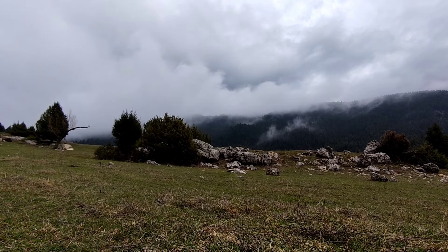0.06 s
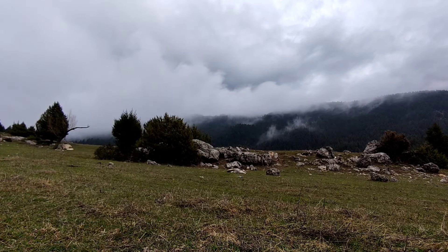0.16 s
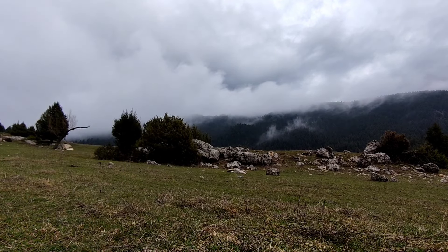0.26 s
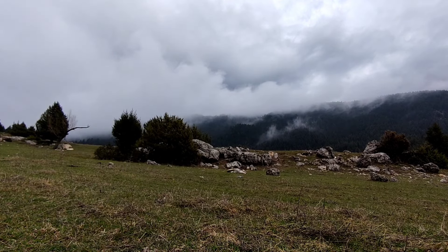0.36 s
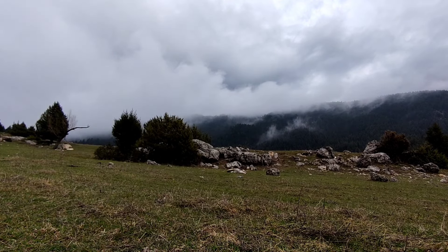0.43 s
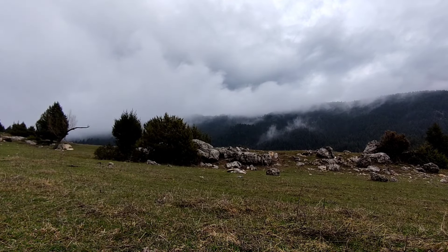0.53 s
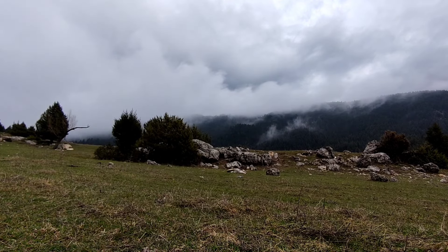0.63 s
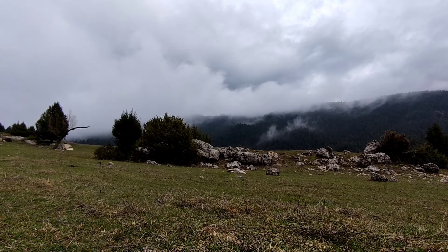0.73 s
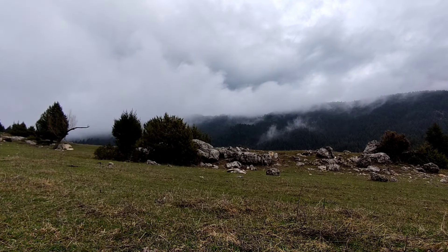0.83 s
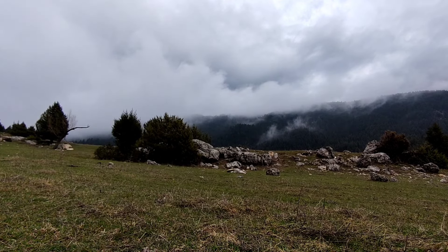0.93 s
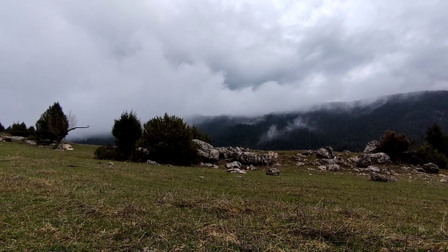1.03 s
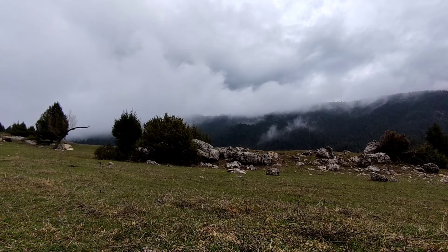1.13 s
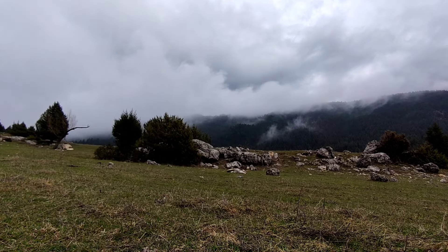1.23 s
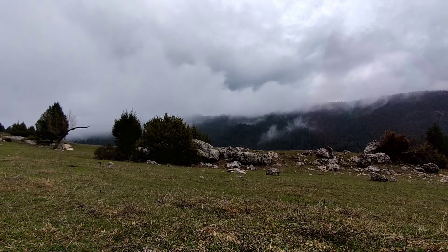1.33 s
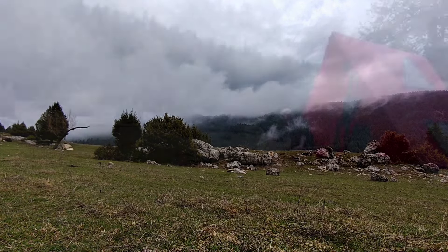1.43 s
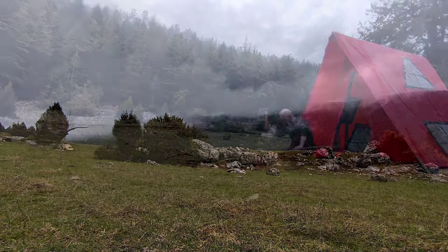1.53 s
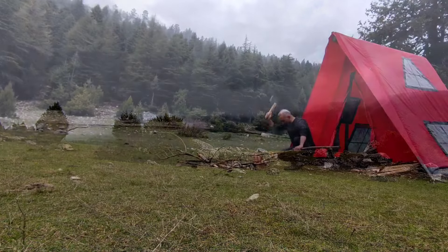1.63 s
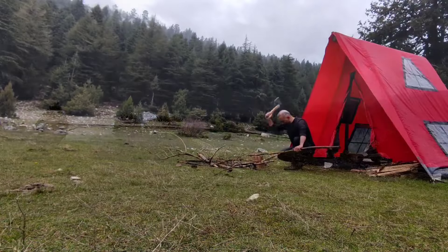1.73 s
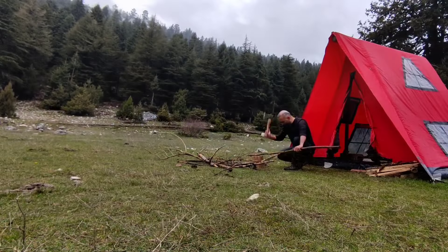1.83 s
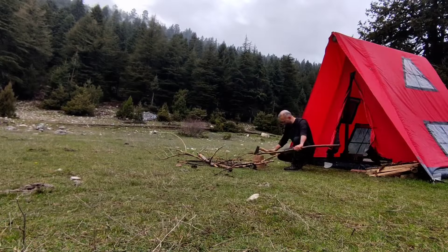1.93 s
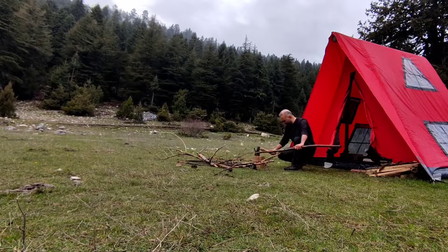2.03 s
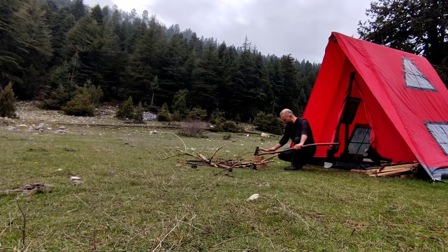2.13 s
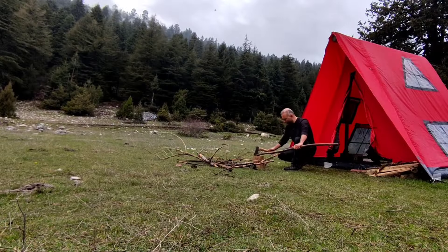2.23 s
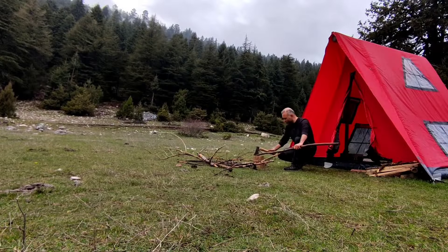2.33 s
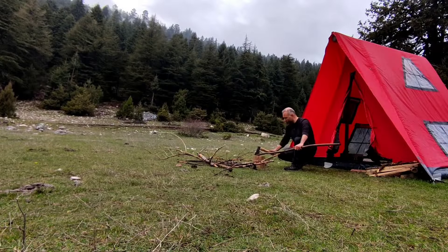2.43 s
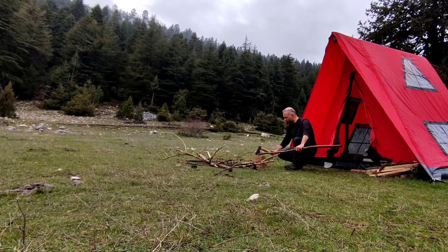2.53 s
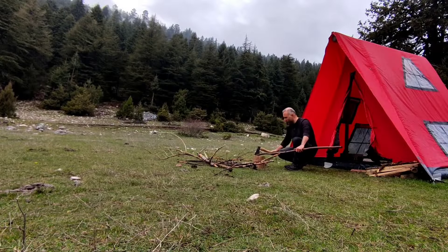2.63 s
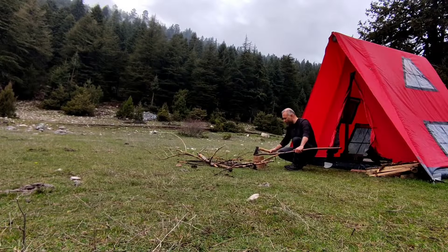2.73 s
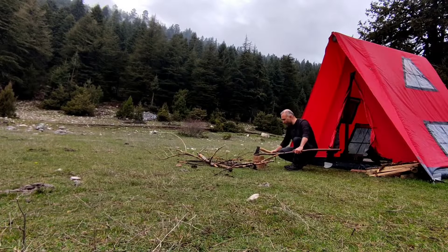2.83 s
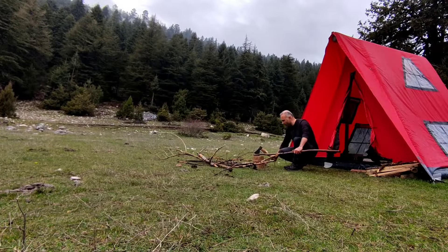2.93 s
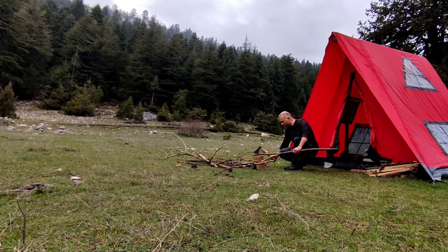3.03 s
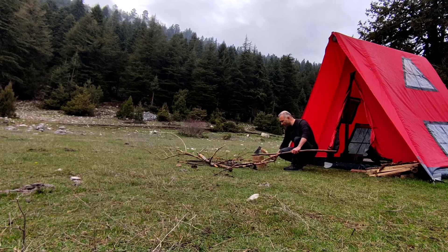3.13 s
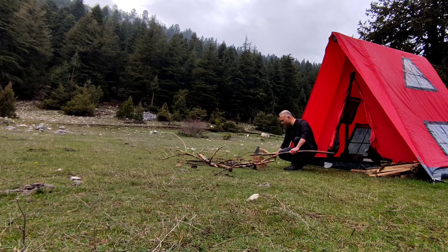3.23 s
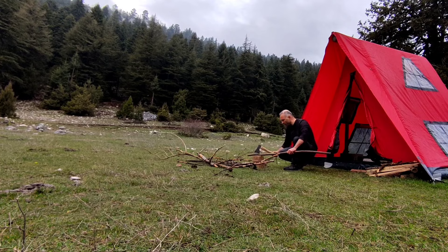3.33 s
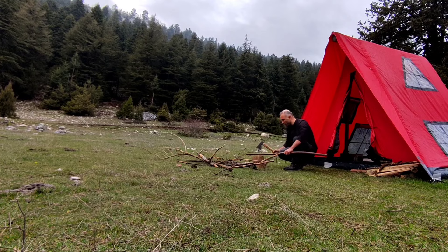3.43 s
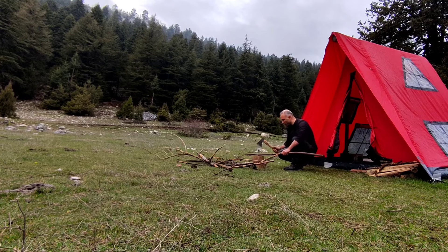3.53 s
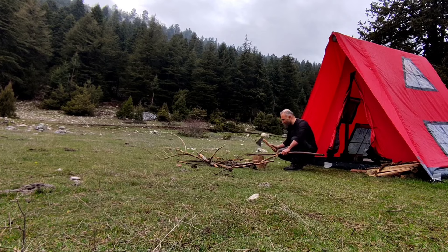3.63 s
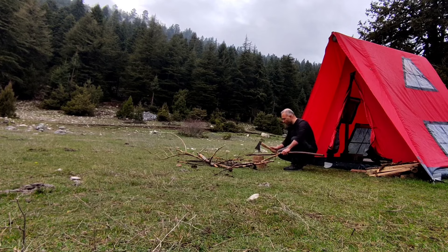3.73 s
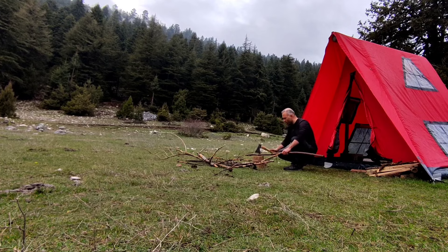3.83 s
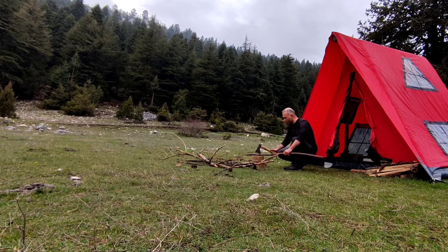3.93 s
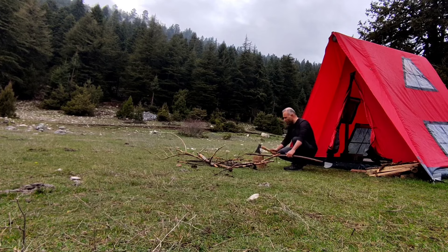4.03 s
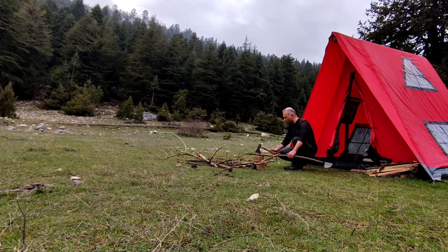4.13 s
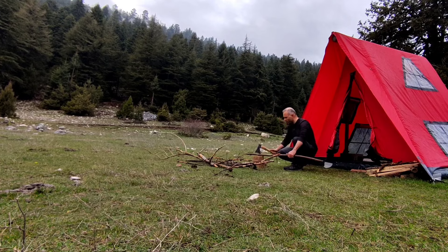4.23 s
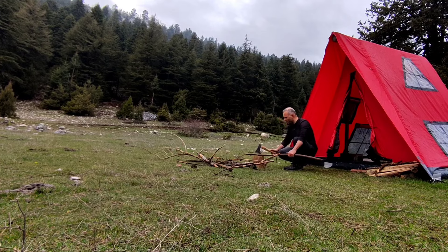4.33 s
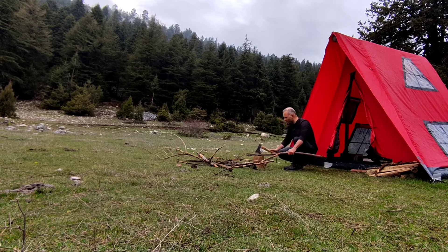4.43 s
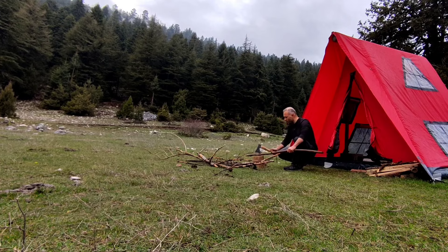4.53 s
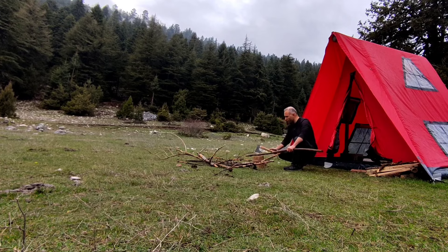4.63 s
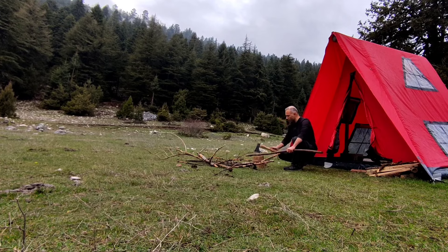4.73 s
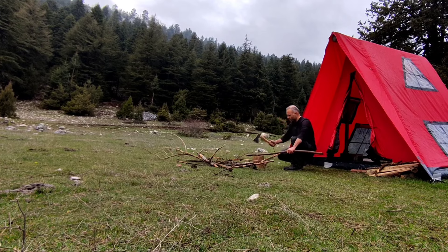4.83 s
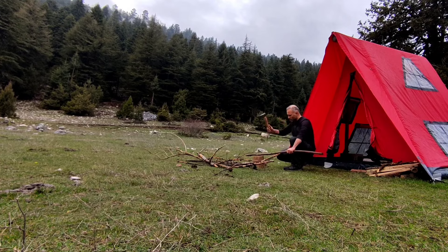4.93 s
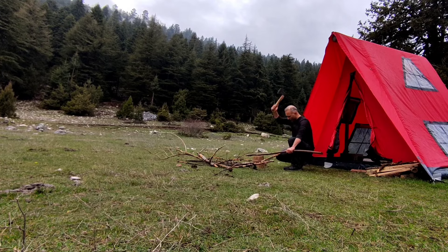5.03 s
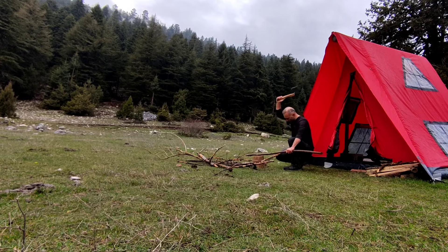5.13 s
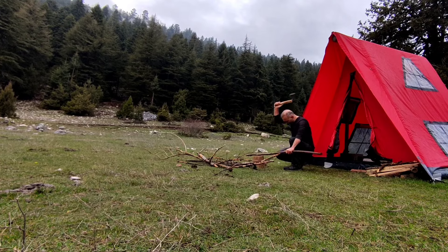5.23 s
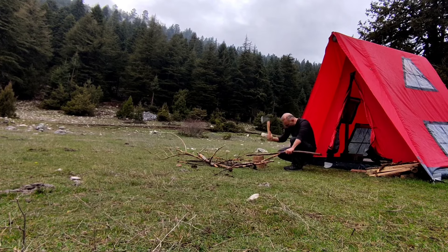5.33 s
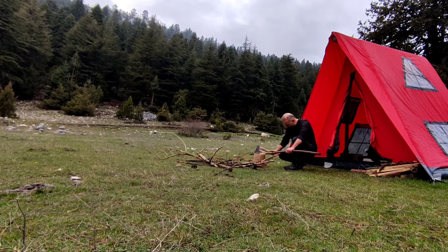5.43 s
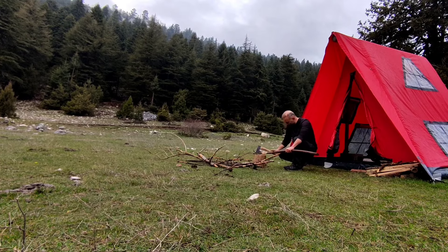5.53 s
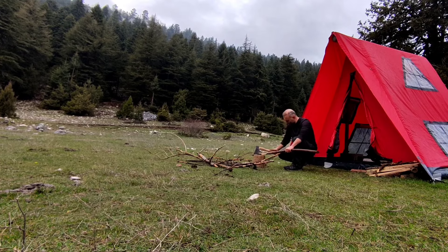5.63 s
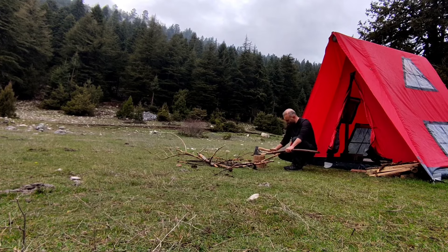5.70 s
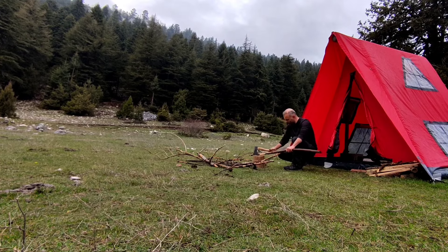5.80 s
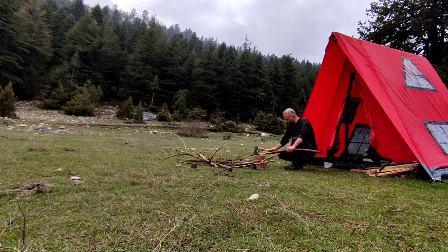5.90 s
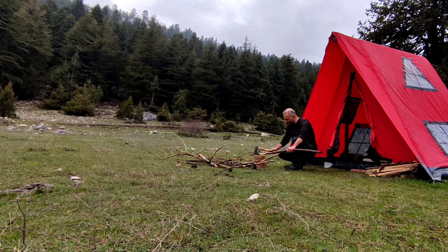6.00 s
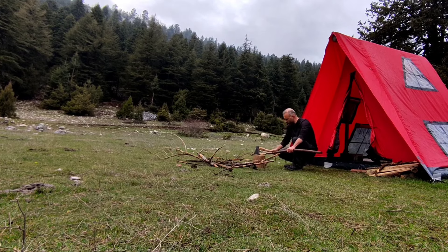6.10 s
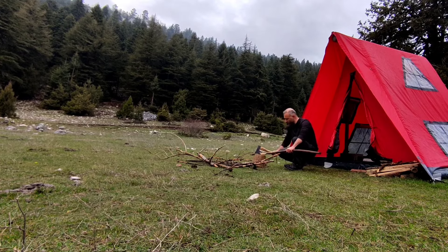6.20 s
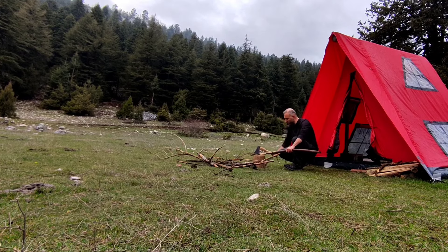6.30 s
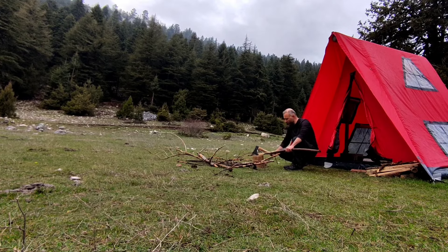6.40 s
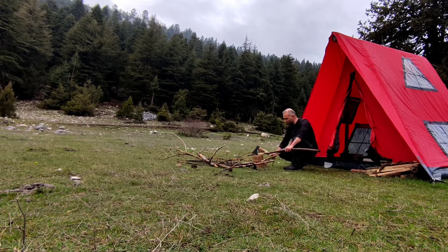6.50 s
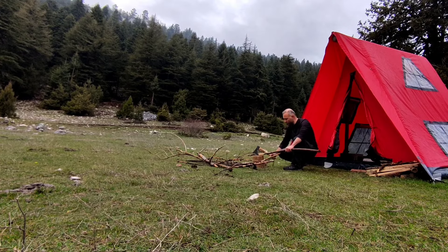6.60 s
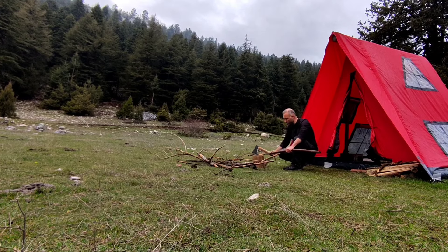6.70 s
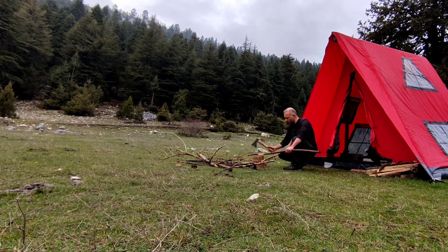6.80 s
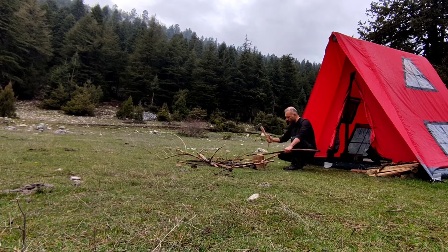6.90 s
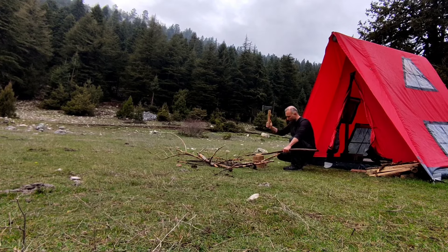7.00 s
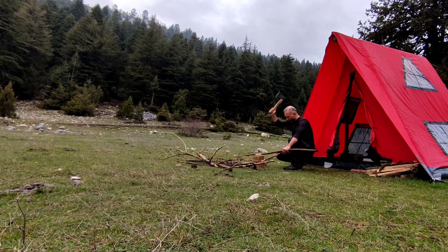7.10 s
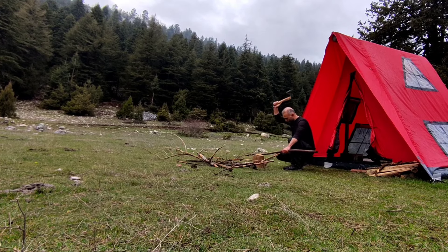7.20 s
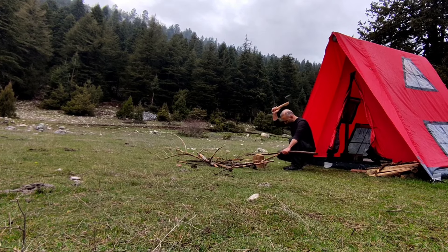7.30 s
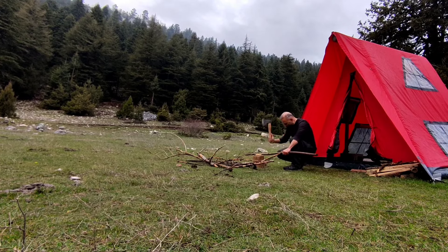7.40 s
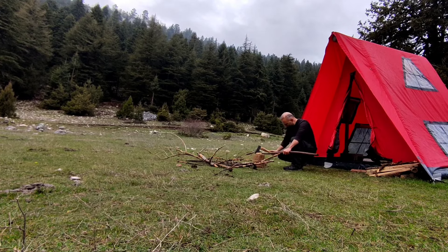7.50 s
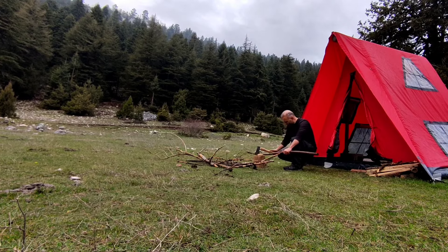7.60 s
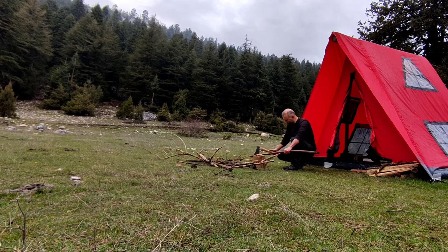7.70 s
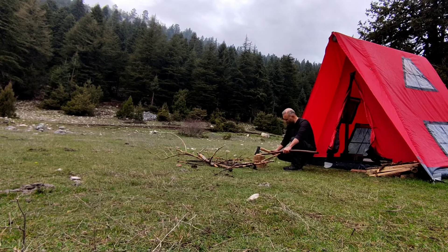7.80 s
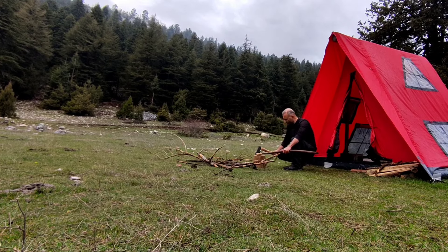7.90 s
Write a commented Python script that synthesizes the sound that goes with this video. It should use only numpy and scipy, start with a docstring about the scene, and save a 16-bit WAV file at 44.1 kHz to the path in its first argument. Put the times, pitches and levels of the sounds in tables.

```python
"""A mountain meadow by a forest edge: a hatchet chops a dry branch on a wooden block, with three hard blows
and a light one (the second). Fibres crack, the block thuds, chips fall, twigs rattle and the trees echo.
Gusts rumble in the microphone and stir dry grass, then a crossfade leads to calm with a few faint puffs;
small birds twitter far away over a soft rush of air. Wood is noise and short impulses ringing resonances,
wind, grass and air are coloured noise, and birds are sine waves with bending pitch."""
import sys
import numpy as np
from scipy import signal
from scipy.fft import rfft, irfft, next_fast_len
from scipy.io import wavfile
from scipy.ndimage import uniform_filter1d

SR = 44100
rng = np.random.default_rng(int(sys.argv[2]) if len(sys.argv) > 2 else 0)


def dump(signal):
    """Clip the signal to [-1, 1] and save it as 16-bit WAV at the path in sys.argv[1]."""
    limited = np.clip(np.atleast_2d(signal).T, -1, 1)
    pcm = np.round(limited * 32767).astype(np.int16)
    wavfile.write(sys.argv[1], SR, pcm)


N = 350595
T = np.arange(N) / SR
CUTOFF_HZ = 16000  # top of the sound

# All levels in the tables are relative: the functions may trim them further.
# How long the fibres tear (Gaussian spread), and the time until the head stops on the block.
CRACK_SPREAD_S, REACH_BLOCK_S = 0.0016, 0.002948
SLAPBACK_S, SLAPBACK_DB = 0.0061, -28.5  # slapback from close by: a second, weaker crack
# Hatchet blows. Each row: start in seconds, crack level in dB, crack pitch in Hz, pitch emphasis in dB,
# treble tilt in dB per octave, thud level in dB, contact time in seconds, knock pitch in Hz,
# knock level in dB, splinter level in dB, splinter decay by 60 dB in seconds, singing level in dB.
CHOPS = [(1.971, -14, 3090, 16, -3, -12.5, 0.00089, 520, 2, -26.5, 0.061, -54),
         (3.8451, -44, 3340, 30.5, 2, -42.5, 0.0003, 490, 2, -46, 0.083, -69),
         (5.457, -10.5, 4070, 7.5, -3, -12.5, 0.00062, 764.4, 9, -25, 0.085, -48),
         (7.5207, -10.5, 4130, 11.5, 0, -12, 0.0012, 833, 9, -26.5, 0.086, -48)]
# The spot where each blade stroke lands favours some resonances and sits on a still point of others.
# One list for each blow; each row: pitch in Hz, boost or cut in dB.
SPOTS = [
    [(1100, 3.5), (2875, 4), (7500, 4.5), (275, -12), (2400, -7), (5550, -7.5)],
    [(250, 11), (475, 3.5), (700, 12.5), (2750, 10.5), (560, -14), (1300, 0), (2030, -23)],
    [(299, 6), (530, 0.5), (4900, 2.5), (650, -8), (1202, -11), (1680, -3.5), (6040, -11)],
    [(507, 2.5), (650, 1), (2600, 3.5), (3550, 4), (5470, 7), (276, -13), (3070, -12.5), (5000, -7)],
]


def chops(tearing_db=-10, tearing_t60=0.08, block_db=2, fibres_db=4):
    """Each blow cracks and thuds, then splinters and drops bark, coloured by the spot the blade hits."""
    out, lead = np.zeros(N), .006  # seconds of room before the contact
    t = np.arange(SR // 3) / SR - lead
    for row, spot in zip(CHOPS, SPOTS):
        s, crack_db, hz, emphasis_db, treble_db, thud_db, contact = row[:7]
        knock_hz, knock_db, splinter_db, splinter_t60, singing_db = row[7:]
        blow = from_db(crack_db) * crack(t, CRACK_SPREAD_S, hz, emphasis_db, treble_db)
        slapback = crack(t - SLAPBACK_S, CRACK_SPREAD_S, hz, 0, treble_db)
        blow += from_db(crack_db + SLAPBACK_DB) * slapback
        blow -= from_db(thud_db + block_db) * thud(t, contact, REACH_BLOCK_S, knock_hz, knock_db)
        blow += from_db(splinter_db + fibres_db) * splinters(t, splinter_t60)
        blow += from_db(singing_db) * ringing(t)
        finest_fibres = colour(grains(len(t), spread_db=-1.5) * fade(t, tearing_t60), STALK)
        blow += from_db(splinter_db + tearing_db) * finest_fibres
        add(out, s - lead, struck_at(blow, spot))
    return out


# Short cross-grain rings of the branch. Each row: pitch in Hz, width in Hz, level in dB.
BRANCH = [(1553, 68, -6), (1837, 88, -14), (2410, 100, -3), (2622, 130, -9), (3614, 100, -11),
          (4250, 620, -23.5), (5150, 230, -26), (6800, 210, -6.5), (8460, 1000, -5.5), (9730, 250, -4)]
# Colour of the crack. Each row: frequency in Hz, level in dB per Hz.
CRACK = [(150, -22), (500, -4), (850, 0), (1300, -9), (2300, -1), (3400, -4), (5400, -2), (7000, -6),
         (10000, -5), (13000, -4), (16000, -12)]


def crack(t, spread, hz, emphasis_db, treble_db, ring_db=11, width_hz=420):
    """The edge tears through the fibres in a few milliseconds and sets the branch ringing."""
    bite = np.exp(-.5 * (t / spread) ** 2)
    snaps = tear(bite)
    rings = sum(from_db(db) * resonate(snaps, f, w) for f, w, db in BRANCH)
    wood = snaps + from_db(ring_db) * rings
    # the piece under the blade has a pitch of its own
    wood = wood + from_db(emphasis_db) * resonate(wood, hz, width_hz)
    wood = colour(wood, [(f, db + treble_db * np.log2(max(f, 3000) / 3000)) for f, db in CRACK])
    return wood * np.sqrt(np.sum(bite ** 2) / np.sum(wood ** 2))


def tear(bite, count=4):
    """A short volley of fibre snaps that excites all pitches about evenly."""
    snaps = rng.standard_normal(len(bite)) * bite
    for _ in range(count):  # flatten the spectrum, then shorten the sound again
        spectrum = rfft(snaps)
        snaps = irfft(spectrum / (np.abs(spectrum) + 1e-12), len(bite)) * np.sqrt(bite)
    return snaps


# Block and branch bending together. Each row: pitch in Hz, level in dB, decay by 60 dB in seconds.
BLOCK = [(97.8, -20.5, 0.18), (128, -16.5, .07), (194, -2.5, 0.054), (260, -9.5, 0.056), (353, 1, 0.023),
         (425, -1.5, .04), (520, 2.5, 0.022), (574, -13, 0.056), (635, -8, 0.046), (920.6, -6, 0.075),
         (1033, -9.5, 0.052)]


def thud(t, contact, stop_s, knock_hz, knock_db, knock_t60=0.028, first_share=0.21, radiate_hz=70):
    """The branch is pressed down, then the head stops on the block; a longer contact is duller."""
    press = first_share * np.exp(-np.abs(t) / contact * 2)
    push = np.exp(-np.abs(t - stop_s) / contact * 2) - press
    age = t - t[0]
    # the free end of the branch adds a knock that depends on its length
    modes = list(BLOCK) + [(knock_hz, knock_db, knock_t60)]
    body = sum(from_db(db) * np.cos(2 * np.pi * hz * age) * fade(age, t60) for hz, db, t60 in modes)
    # a small block radiates little bass
    body = signal.sosfilt(signal.butter(5, radiate_hz, "high", fs=SR, output="sos"), body)
    return signal.fftconvolve(push / (contact * SR), body)[:len(t)]


# Colour of splintering. Each row: frequency in Hz, level in dB per Hz.
SPLINTER = [(100, -15), (300, 13), (800, 4), (1500, 0.5), (2800, -2), (4600, 1), (7000, -7.5), (10000, -1),
            (12000, -16), (16000, -23.5)]


def splinters(t, t60, litter_t60=0.33, litter_db=-24, crumbs_db=-24):
    """A dense crackle of parting fibres, then lighter litter and crumbs of bark."""
    litter = from_db(litter_db) * fade(t, litter_t60) * lumpy(len(t), spread_db=1.5, lump_s=0.0033)
    crackle = grains(len(t), spread_db=5) * (fade(t, t60) + litter)
    return colour(crackle + from_db(crumbs_db) * crumbs(t), SPLINTER)


def crumbs(t, t60=0.33, size_db=0.0, per_s=900):
    """Bits of bark patter down at random after a blow, ever more lightly."""
    landed = rng.random(len(t)) < per_s / SR
    spread = size_db * np.clip(rng.standard_normal(len(t)), -2, 2)
    sizes = rng.choice([-1, 1], len(t)) * from_db(spread)
    return rms_one(landed * sizes) * fade(t, t60)


# Faint lasting rings of the branch. Each row: pitch in Hz, level in dB, decay by 60 dB in seconds.
SINGING = [(1316, 1, 0.11), (1430, 3, .16), (1803.4, 0.5, .16), (2330, 0, .2), (3612, -2.5, 0.2),
           (4020, 2.5, .26), (4560, -0.5, .26), (5640, -3.5, 0.15), (7200, -4, .2), (8461, -5, .22)]


def ringing(t):
    """The dry branch sings on faintly after the crack, each mode with a chance strength of its own."""
    return sum(from_db(db + rng.normal(0, 3)) * np.sin(2 * np.pi * hz * t) * fade(t, t60)
               for hz, db, t60 in SINGING)


def struck_at(x, spot, lift_width=0.11, node_width=0.13):
    """Resonances that the spot favours ring out; those with a still point there drop away."""
    for hz, db in spot:
        width = hz * (lift_width if db > 0 else node_width)
        x = x + (from_db(db) - 1) * resonate(x, hz, width)
    return x


# Pieces of wood knocking; the row at 5.4662 s is the branch breaking a second time. Each row: start in seconds,
# # peak of the wood in dB, pitch in Hz, rattle decay by 60 dB in seconds, snap in dB against the knock, dull
# above # this Hz, mode width as a share of its pitch, turf thump in dB against the knock.
KNOCKS = [(2.046, -38.5, 900, 0.027, 1, 1200, 0.43, -6), (2.049, -37.5, 545, 0.015, -1, 1200, 0.28, -12.5),
          (2.192, -51, 421, 0.06, -12, 3000, 0.17, 0), (2.304, -48, 636, 0.018, -0.5, 896, 0.21, -4),
          (2.398, -48.5, 874, 0.035, -22, 1100, 0.04, -1.5),
          (2.402, -49.5, 1120, 0.045, -26, 1300, 0.054, 6), (2.432, -52, 925, 0.033, -26, 1200, .12, -4),
          (2.552, -48.5, 1020, 0.062, 4.5, 2000, .16, -5),
          (3.845, -34.5, 934, 0.025, -17, 1190, 0.19, -13.5), (3.861, -37, 470, 0.096, -13, 1520, 0.12, -6),
          (5.4662, -23, 950, 0.033, -3, 2000, 0.34, -21), (5.664, -40, 930, 0.024, -31, 1300, 0.21, -4),
          (5.665, -41, 716, 0.015, -30, 1000, .15, -14), (5.684, -52, 650, 0.043, -30, 980, 0.18, -10),
          (5.906, -34, 650, 0.034, -27, 6150, 0.26, -15.5), (7.613, -53, 953, 0.099, -20.5, 1200, 0.11, 2),
          (7.631, -49, 820, 0.044, -25, 978, .12, -21), (7.937, -45.5, 360, 0.011, 7.5, 3030, 0.37, 4.5)]
# Splinters giving way. Each row: start in seconds, ring peak in dB, pitch in Hz, decay by 60 dB in seconds,
# fibre tick in dB against the ring.
SNAPS = [(2.006, -27, 4300, 0.022, -23), (2.051, -39, 5200, 0.035, 2), (2.056, -52, 4450, 0.017, 8),
         (3.86, -38, 2800, 0.019, -17), (5.501, -33.5, 5170, 0.0093, 1.5), (5.509, -38, 5500, 0.02, -1),
         (7.643, -45, 4036, 0.0084, -11), (7.693, -50, 2400, 0.024, -9), (7.719, -48, 6300, 0.013, -6),
         (7.937, -43, 2750, 0.025, -10)]
# The branch drops back on the block. Each row: start in seconds, level in dB.
REBOUNDS = [(3.854, -43), (5.536, -38.5), (7.589, -42)]


def knocks(snap_width_hz=900, rebound_contact_s=0.0012, rebound_hz=253, rebound_db=0):
    """Pieces of wood land and the branch breaks once more; splinters give way with a small high snap; the
    branch rebounds."""
    out, t = np.zeros(N), np.arange(SR // 8) / SR
    for s, db, *piece in KNOCKS:
        add(out, s, from_db(db) * chip(*piece))
    for s, db, hz, t60, tick_db in SNAPS:
        split = grains(len(t), spread_db=2) * fade(t, t60)
        ring = peak_one(resonate(split, hz, snap_width_hz))
        tick = peak_one(colour(split, STALK))
        add(out, s, from_db(db) * (ring + from_db(tick_db) * tick))
    for s, db in REBOUNDS:
        drop = thud(t, rebound_contact_s, REACH_BLOCK_S, rebound_hz, rebound_db, first_share=0)
        add(out, s - REACH_BLOCK_S, from_db(db) * drop)
    return out


# Modes of a loose piece. Each row: multiple of its pitch, level in dB.
PIECE = [(.68, -3.5), (0.999, 7), (1.38, -17), (1.701, -16), (2.06, -11.5), (3.9, -13), (4.499, -21)]


def chip(hz, t60, snap_db, dull_hz, damping, thump_db, snap_t60=0.007, thump_t60=0.059):
    """One contact and a short rattle ring a loose piece, with a bright snap and a thump in the turf."""
    t = np.arange(SR // 8) / SR
    touch = (t == 0) + .15 * grains(len(t), spread_db=2) * fade(t, t60)
    wood = sum(from_db(db) * resonate(touch, ratio * hz, damping * hz * ratio) for ratio, db in PIECE)
    wood = signal.sosfilt(signal.butter(2, min(dull_hz, CUTOFF_HZ), fs=SR, output="sos"), wood)
    snap = colour(grains(len(t), spread_db=1.0) * fade(t, snap_t60), SPLINTER)
    thump = colour(grains(len(t), spread_db=1.5) * fade(t, thump_t60), TURF)
    return peak_one(wood) + from_db(snap_db) * peak_one(snap) + from_db(thump_db) * peak_one(thump)


# The far end of the branch whips into the brush pile. Each row: middle in seconds, spread in seconds,
# twig rattle in dB, ground thump in dB.
SHAKES = [(2.145, 0.021, -62.5, -51.5), (5.609, 0.026, -61.5, -49), (7.575, .018, -51, -63),
          (7.671, 0.025, -57.5, -55.5)]
# Colours of the twigs and of the turf under them. Each row: frequency in Hz, level in dB per Hz.
TWIGS = [(500, -9), (1500, -10), (2800, -2), (4500, 4), (7000, -5), (9500, 4), (11500, -16.5), (16000, -14)]
TURF = [(60, -18.5), (130, 3), (250, 3.5), (500, -4.5), (900, -22.5), (2500, -49.5)]


def shakes(ticks_per_s=5000, width_hz=350):
    """After a hard blow the branch whips back: its twigs rattle and its end thumps on the turf."""
    twigs = rms_one(colour(ticking(ticks_per_s, width_hz), TWIGS))
    turf = colour(grains(N, spread_db=3.5), TURF)
    rattle = twigs * swells(row[:3] for row in SHAKES)
    return rattle + turf * swells((s, spread, db) for s, spread, _, db in SHAKES)


# Colour of the echo. Each row: frequency in Hz, level in dB per Hz.
ECHO = [(50, -18), (110, 1), (220, 5.5), (450, -3), (900, -19), (2500, -9.5), (4100, -10), (5200, -5),
        (9000, -8), (12000, -17.5), (16000, -16.5)]


def forest(x, near_db=-27, near_t60=0.54, edge_db=-35, edge_s=0.19, edge_spread=0.18,
           far_db=-35, far_t60=0.98, trim_db=-9.0):
    """Scatter from ground and tent, a smeared echo off the tree line and a faint tail from the woods."""
    t = np.arange(SR) / SR
    near = fade(t - .012, near_t60)
    edge = np.exp(-.5 * ((t - edge_s) / edge_spread) ** 2)
    far = fade(t - .1, far_t60)
    shapes = [(near_db, near), (edge_db, edge), (far_db, far)]
    envelope = np.sqrt(sum((from_db(db) * rms_one(shape)) ** 2 for db, shape in shapes) / SR)
    trunks = lumpy(SR, spread_db=2.5, lump_s=0.003)  # makes the echo uneven
    response = colour(rng.standard_normal((2, SR)) * envelope * trunks, ECHO)
    return from_db(trim_db) * signal.fftconvolve(x[None], response, axes=1)[:, :N]


# How far the left port leads for the chopping. Each row: frequency in Hz, phase in radians.
PORT_PHASE = [(60, 0), (550, .25), (1400, .95), (2900, 1.55), (5000, 1.45), (7000, 1.2), (9500, 2.3),
              (16000, 2.3)]
# Balance of the ports for the chopping. Each row: frequency in Hz, left against right in dB.
PORT_BALANCE = [(200, 1.3), (600, 0), (1500, 1.5), (2500, .5), (4200, -2), (6000, 0), (8000, -4),
                (10500, 3), (15000, 1.5)]


def ports(x):
    """Chopping reaches the microphone's left port slightly before the right; each colours it a little."""
    lead = np.exp(.5j * at_bins(PORT_PHASE, N) * [[1], [-1]])
    return irfft(rfft(x) * panned(at_bins(PORT_BALANCE, N)) * lead, N)


# Steady part of the wind on the ports. Each row: time in seconds, level in dB.
WIND = [(0, -40), (.6, -35.5), (.9, -44.5), (1.45, -39), (1.68, -57), (1.85, -53.5)]
# Colour of the rumble. Each row: frequency in Hz, level in dB per Hz.
BUFFET = [(15, -70.5), (25, -47.5), (50, -6), (78, 2.5), (128, 8), (213, -2.5), (350, -12.5), (458, -23.5),
          (620, -35), (900, -55), (1170, -57.5), (1980, -120)]
# Separate gusts. Each row: middle in seconds, level in dB, left against right in dB, spread in seconds.
GUSTS = [(0.054, -33, -31, 0.04), (0.296, -23, -8, 0.031), (0.41, -34, -5.5, 0.024),
         (0.517, -30.5, 22, 0.034), (0.668, -29, 6, 0.03), (1.041, -27.5, -31, 0.013),
         (1.116, -30, 5, 0.041), (1.265, -30.5, 6, 0.031), (1.342, -28, 22, 0.025), (1.57, -41, 4.5, 0.034),
         (1.725, -42.5, 2, 0.03), (2.948, -60, -12, 0.038), (3.379, -59, -7, 0.062), (3.58, -71, 2, 0.084)]
# Single eddies hitting a port. Each row: middle in seconds, peak level in dB, left against right in dB,
# length in seconds.
EDDIES = [(0.133, -15.5, -28, 0.0036), (.266, -5.5, -26, 0.003), (0.418, -8, -30, 0.0028),
          (.516, -14, 20, 0.0037), (0.604, -23, 30, 0.0021), (1.037, -16, -30, 0.0027),
          (0.086, -25, -25, 0.0034), (1.101, -20, -15, 0.0035), (1.133, -17.5, 1, 0.0043),
          (1.331, -22, 9, 0.0045)]


def wind(buffet_db=1.0, eddy_db=-2, flutter_db=6.5, flutter_s=0.032):
    """Turbulence rumbles and flutters in each port separately; gusts swell it and strong eddies bump it."""
    rumble = colour(rng.standard_normal((2, N)), BUFFET)
    rumble /= uniform_filter1d(rumble ** 2, SR // 20, axis=-1) ** .5  # even out its level
    flutter = np.array([lumpy(N, spread_db=flutter_db, lump_s=flutter_s) for port in rumble])
    power = (from_db(in_time(WIND)[0]) * flutter * windy()) ** 2
    for s, db, side_db, spread in GUSTS:
        power += (from_db(db) * panned(side_db)[:, None]) ** 2 * np.exp(-((T - s) / spread) ** 2)
    out = from_db(buffet_db) * np.sqrt(power) * rumble
    for s, db, side_db, length in EDDIES:
        u = 2 * (T - s) / length
        bump = (1 - u * u) / (1 + u * u / 2) ** 3  # a push with a small pull on either side
        out += from_db(db + eddy_db) * panned(side_db)[:, None] * bump
    return out


CALM_FROM_S, CALM_BY_S = 1.65, 2.14  # a windy stretch crossfades into a calm one


def windy():
    """1 in the windy stretch, fading to 0 across the crossfade."""
    return np.interp(T, [CALM_FROM_S, CALM_BY_S], [1, 0])


# Wind in the grass. Each row: time in seconds, level in dB.
GRASS_DB = [(0, -62), (.5, -64.5), (.66, -59), (.82, -64), (1.2, -63.5), (1.4, -68.5), (1.85, -66.5)]
# Colours of the hiss and of the dry blades. Each row: frequency in Hz, level in dB per Hz.
GRASS = [(400, 3), (700, 3), (1100, -2.5), (1600, 2.5), (2200, -2), (3000, -12), (4600, -5.5), (6000, -20),
         (8700, -7), (11000, -18.5), (13000, -14.5), (16000, -15.5)]
BLADES = [(1200, -4.5), (3000, -10), (4500, -4), (6500, -1.5), (8800, 2.5), (10500, -13), (13000, -5),
          (16000, -20)]
# Short rustles of dry blades. Each row: middle in seconds, spread in seconds, level in dB.
RUSTLES = [(.043, 0.0041, -56.5), (.188, 0.0097, -67), (.262, 0.0019, -62), (.31, 0.009, -69),
           (.35, 0.011, -64), (.715, 0.025, -65), (.86, 0.0053, -68), (1.10, 0.01, -76),
           (1.146, 0.004, -61), (1.231, 0.004, -49), (1.246, 0.0047, -53.5), (1.785, 0.014, -77),
           (2.945, 0.016, -67)]


def grass(hiss_db=3, crackle_db=-5, ticks_per_s=3000, crackle_pan_db=-6, blade_width_hz=500, rustle_db=2):
    """Wind makes the grass hiss unevenly, and its dry blades tick in flurries to the right."""
    hiss = colour(rng.standard_normal((2, N)), GRASS) * lumpy(N, spread_db=1.2, lump_s=.03)
    blades = [rms_one(colour(ticking(ticks_per_s, blade_width_hz), BLADES)) for port in hiss]
    blades = np.array(blades) * panned(crackle_pan_db)[:, None]
    flurries = lumpy(N, spread_db=4, lump_s=.025)
    stirred = from_db(hiss_db) * hiss + from_db(crackle_db) * blades * flurries
    steady = from_db(in_time(GRASS_DB)[0]) * windy() * stirred
    return steady + from_db(rustle_db) * swells(RUSTLES) * blades


# The loudest dry stalks. Each row: start in seconds, level in dB, decay by 60 dB in seconds.
STALKS = [(0.371, -42, 0.033), (.543, -35.5, 0.02), (.579, -35, 0.015), (1.224, -50, 0.025),
          (1.505, -45.5, 0.015), (5.279, -58, 0.03), (5.804, -43.5, 0.016)]
# Colour of a stalk, also lent to the finest wood fibres. Each row: frequency in Hz, level in dB per Hz.
STALK = [(500, -25), (2500, -16), (5000, -6), (9000, 0), (13000, 0), (16000, -6), (18000, -25)]


def stalks(pan_db=-7, gain_db=6):
    """Dry stalks tick close by, to the right: short bursts of bright, uneven noise."""
    out, t = np.zeros((2, N)), np.arange(SR // 8) / SR
    for s, db, t60 in STALKS:
        burst = np.array([grains(len(t), spread_db=11.5) for side in out])
        tick = colour(burst * fade(t, t60), STALK)
        add(out, s, from_db(db + gain_db) * peak_one(tick))
    return out * panned(pan_db)[:, None]


# Bird calls. Each row: start in seconds, level in dB, pitch in Hz, length in seconds.
SLURS = [(2.645, -71, 5000, 0.15), (2.93, -69, 4760, 0.14), (3.205, -73, 4820, 0.135)]  # chirps that sweep up and fall back; the pitch is the top
RISES = [(2.395, -72, 4530, 0.05), (2.57, -76, 5220, 0.058), (2.845, -69, 4990, 0.061),
         (3.125, -66, 4870, 0.056), (3.43, -83.5, 4930, 0.045), (6.075, -71, 4930, 0.1),
         (6.43, -74, 4930, 0.11), (6.81, -75.5, 4900, 0.11)]  # rising whistles; the pitch is the top
DIPS = [(2.395, -66, 8300, 0.058), (2.615, -70.5, 6110, 0.058), (6.311, -69, 6440, 0.0483),
        (6.70, -81, 6250, 0.049)]  # high dipping chips; the pitch is the lowest
LEVELS = [(2.44, -74, 4500, 0.08), (2.76, -73, 4420, 0.13), (3.41, -76.5, 4320, 0.072),
          (3.51, -78, 4300, .06), (3.565, -76, 4100, 0.055), (7.31, -74, 4070, .13)]  # level notes
ARCHES = [(5.638, -68, 4750, 0.108)]  # arched notes; the pitch is the top
# Shape of each kind: pitch at even steps through the call, as a share of the call's pitch.
SLUR = (.68, .77, .85, .96, 1, .95, .91, .91)
RISE = (.91, .95, .98, 1)
DIP = (1.09, 1.02, 1, 1.01, 1.07)
LEVEL = (1.01, 1, 1, .99)
ARCH = (.85, .9, 1, .99, .95, .88)


def birds(slur_peak=0.12, swell_power=0.38, waver=.013, flicker_db=4.5):
    """Five kinds of thin whistle, each with its own bend; distance blurs them and breaks them up."""
    out = np.zeros(N)
    # the last entry is where in the call it is loudest, as a share of its length
    kinds = [(SLURS, SLUR, slur_peak), (RISES, RISE, .5), (DIPS, DIP, .5), (LEVELS, LEVEL, .5),
             (ARCHES, ARCH, .5)]
    for calls, shape, peak in kinds:
        for s, db, pitch_hz, length in calls:
            u = np.linspace(0, 1, int(length * SR))
            bend = np.interp(u, np.linspace(0, 1, len(shape)), shape)
            drift = rms_one(uniform_filter1d(rng.standard_normal(SR), size=90))[:len(u)]
            hz = pitch_hz * bend * (1 + waver * drift)
            swell = np.interp(u, [0, peak, 1], [0, 1, 0]) ** swell_power
            flicker = lumpy(SR, spread_db=flicker_db, lump_s=0.0056)[:len(u)]
            add(out, s, from_db(db) * swell * flicker * np.sin(2 * np.pi * np.cumsum(hz) / SR))
    return out


# Cloth swishes. Each row: middle in seconds, spread in seconds, level in dB, centre in Hz.
SWISHES = [(3.74, 0.15, -71.5, 6800), (4.15, 0.16, -77.5, 7340), (4.806, 0.013, -73.5, 7500),
           (5.96, 0.12, -69, 7320), (7.11, 0.093, -72, 9400), (7.82, 0.058, -75.5, 5480)]


def sleeves(width_hz=4800):
    """Cloth brushes on cloth as the arm moves: swells of noise passed twice through a broad resonance."""
    out = np.zeros((2, N))
    for s, spread, db, hz in SWISHES:
        rub = resonate(resonate(rng.standard_normal((2, N)), hz, width_hz), hz, width_hz)
        out += from_db(db) * rms_one(rub) * np.exp(-.5 * ((T - s) / spread) ** 2)
    return out


# Colour of the far air. Each row: frequency in Hz, level in dB per Hz.
AIR = [(18, -37), (30, -16.5), (75, -1.5), (157, -1), (204, 1.5), (252, -2), (355, -3.5), (632, -13.5),
       (1320, -13.5), (2230, -23.5), (3870, -26), (5310, -30.5), (8300, -34.5), (11100, -38), (16000, -33)]
# Its loudness. Each row: time in seconds, level in dB.
AIR_DB = [(1.9, -65.5), (2.1, -60.5), (5.2, -60.5), (5.7, -60), (7.95, -59.5)]
# How alike left and right are. Each row: frequency in Hz, likeness (1 same, 0 unrelated, below 0 opposed).
LIKENESS = [(60, 0.56), (130, 0.52), (290, 0.87), (640, 0.092), (1410, -0.17), (3100, -0.12), (6820, -0.35),
            (15000, 0.1)]


def air(level_db=-0.5):
    """Far rush of air in the trees: coloured noise, alike in both ears mainly in the bass."""
    alike = np.clip(at_bins(LIKENESS, N), -.95, .95)
    mid, side = rfft(rng.standard_normal((2, N)))
    pair = irfft(mid + np.sqrt((1 - alike) / (1 + alike)) * side * [[1], [-1]], N)
    return from_db(in_time(AIR_DB)[0] + level_db) * colour(pair, AIR)


def from_db(db):
    """Decibels to gain."""
    return 10 ** (np.asarray(db) / 20)


def rms_one(x):
    """Scale to rms 1."""
    return x / np.sqrt(np.mean(x ** 2) + 1e-20)


def peak_one(x):
    """Scale to peak 1."""
    return x / np.abs(x).max()


def in_time(rows):
    """Columns of a curve, at every sample."""
    s, *columns = np.transpose(rows)
    return [np.interp(T, s, c) for c in columns]


def at_bins(points, size):
    """A table over frequency, read at the bins of an FFT."""
    hz, value = np.transpose(points)
    return np.interp(np.log(np.arange(size // 2 + 1) * SR / size + 1), np.log(hz + 1), value)


def colour(x, spectrum):
    """Causal (minimum-phase) filter with the given spectrum; white noise keeps its power."""
    length = x.shape[-1]
    size = 2 * next_fast_len(length)
    gain = rms_one(from_db(at_bins(spectrum, size)))
    cepstrum = irfft(np.log(gain))
    cepstrum[1:size // 2] *= 2  # folding the cepstrum makes the filter causal
    cepstrum[size // 2 + 1:] = 0
    return irfft(rfft(x, size) * np.exp(rfft(cepstrum)))[..., :length]


def resonate(x, hz, width_hz):
    """A resonance with gain 1 on top."""
    r = np.exp(-np.pi * width_hz / SR)
    feed = np.array([1, 0, -1]) * (1 - r * r) / 2
    return signal.lfilter(feed, [1, -2 * r * np.cos(2 * np.pi * hz / SR), r * r], x + 1e-18)


def fade(t, t60):
    """Decay by 60 dB in t60 seconds, silent before t = 0."""
    return (t >= 0) * np.exp(-np.log(1000) * np.abs(t) / t60)


def grains(count, spread_db):
    """A dense run of tiny snaps of uneven size; rms 1."""
    sizes_db = spread_db * np.repeat(np.clip(rng.standard_normal(count), -2, 2), 16)[:count]
    return rms_one(rng.standard_normal(count) * from_db(sizes_db))


def ticking(per_s, width_hz, count=24):
    """Many dry stems tick at random, each ringing briefly at a pitch of its own; rms 1."""
    ticks = (rng.random(N) < per_s / SR) * rng.standard_normal(N)
    dealt = rng.integers(0, count, N)  # which stem ticks
    pitches = np.linspace(1200, 15500, count) * rng.uniform(.97, 1.03, count)
    return rms_one(sum(resonate(ticks * (dealt == k), hz, width_hz) for k, hz in enumerate(pitches)))


def lumpy(count, spread_db, lump_s):
    """A gain that wanders by chance, with lumps of the given length; rms 1."""
    slow = np.interp(np.arange(count), np.arange(count) * lump_s * SR, rng.standard_normal(count))
    return rms_one(from_db(spread_db * slow))


def swells(rows):
    """Level of a set of smooth swells; each row: middle in seconds, spread in seconds, level in dB."""
    return sum(from_db(db) * np.exp(-.5 * ((T - s) / spread) ** 2) for s, spread, db in rows)


def add(out, s, sound):
    """Mix a sound in from time s."""
    start = max(round(s * SR), 0)
    out[..., start:start + sound.shape[-1]] += sound[..., :N - start]


def panned(pan_db):
    """Left and right gains of constant power; negative leans right."""
    gains = np.array([from_db(pan_db / 2), from_db(-pan_db / 2)])
    return gains / np.sqrt(np.mean(gains ** 2, axis=0))


def scene(bird_direct_db=-2, bird_echo_db=23):
    """Chopping and its echo in the open meadow; the birds sit far off among the trees."""
    wood, song = chops() + knocks() + shakes(), birds()
    echoes = forest(wood + from_db(bird_echo_db) * song)
    near = ports(wood) + from_db(bird_direct_db) * song + echoes
    return near + wind() + grass() + stalks() + air() + sleeves()


def record(dry, low_cut_hz=57, top=.9):
    """The deep bass is cut, the highest peaks are rounded and the top is cut."""
    thinned = signal.sosfilt(signal.butter(3, low_cut_hz, "high", fs=SR, output="sos"), dry)
    rounded = top * np.tanh(thinned / top)
    return signal.sosfilt(signal.ellip(10, .1, 80, CUTOFF_HZ, fs=SR, output="sos"), rounded)


dry = scene()
out = record(dry)
dump(out)
```